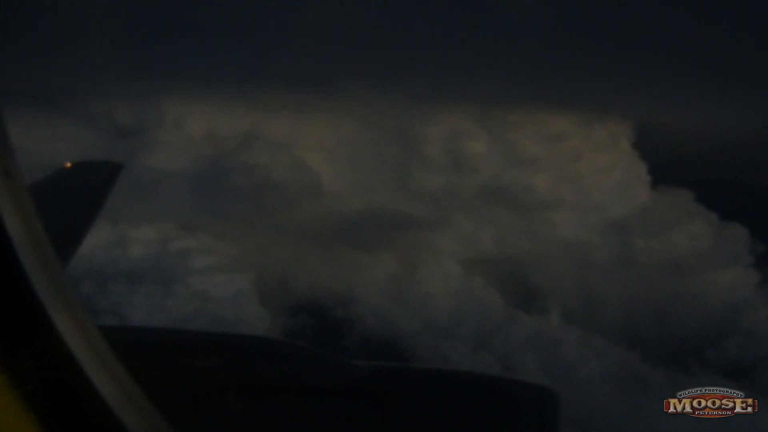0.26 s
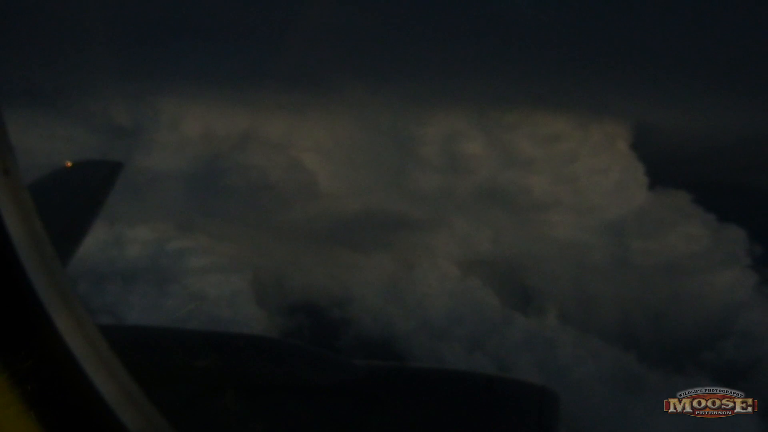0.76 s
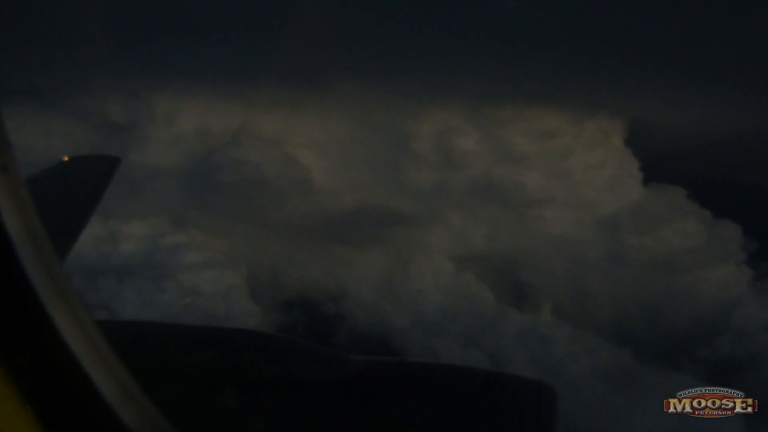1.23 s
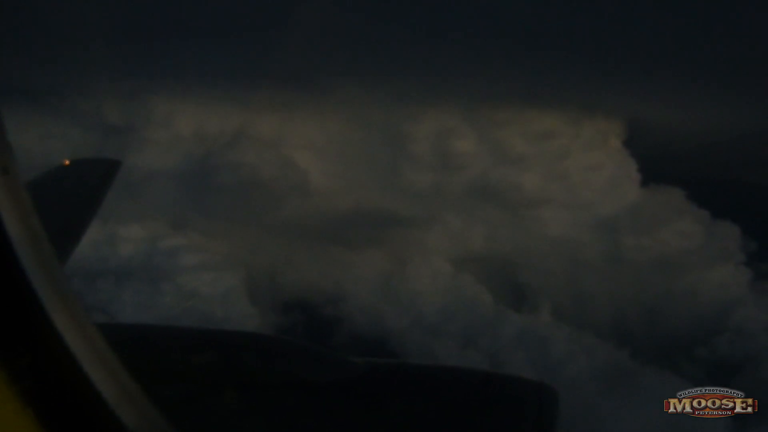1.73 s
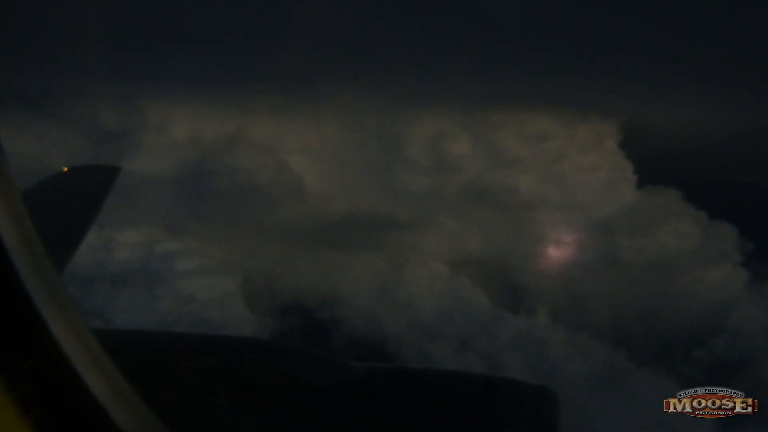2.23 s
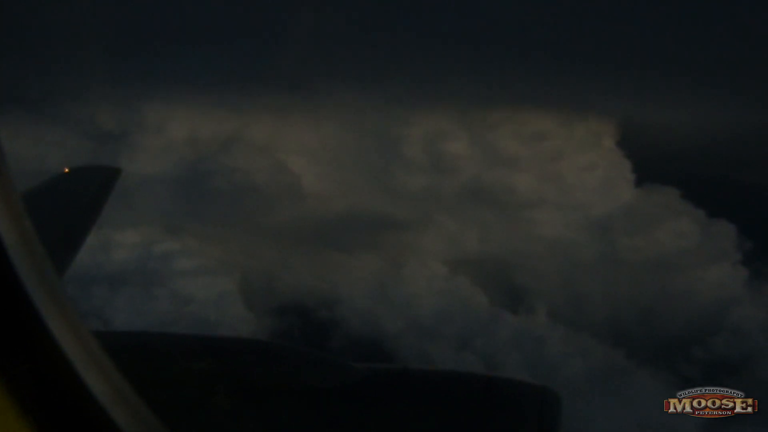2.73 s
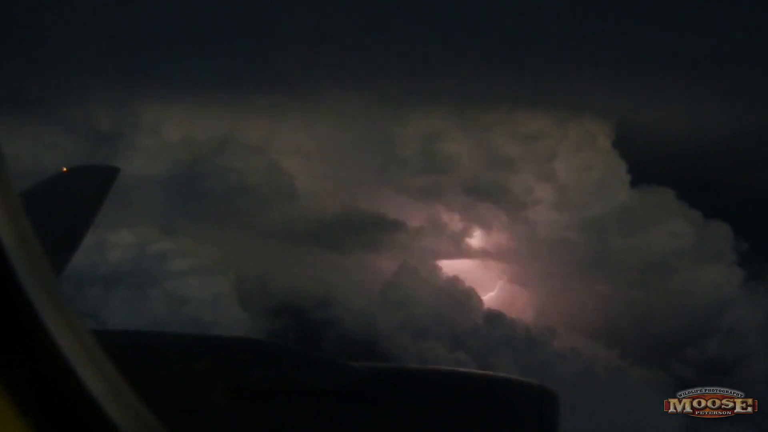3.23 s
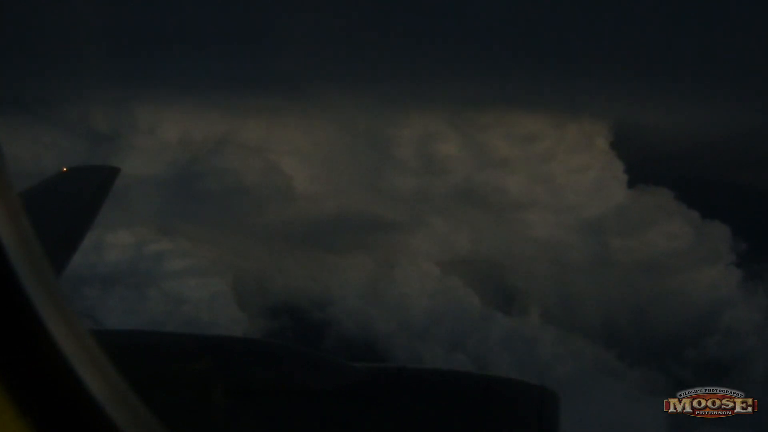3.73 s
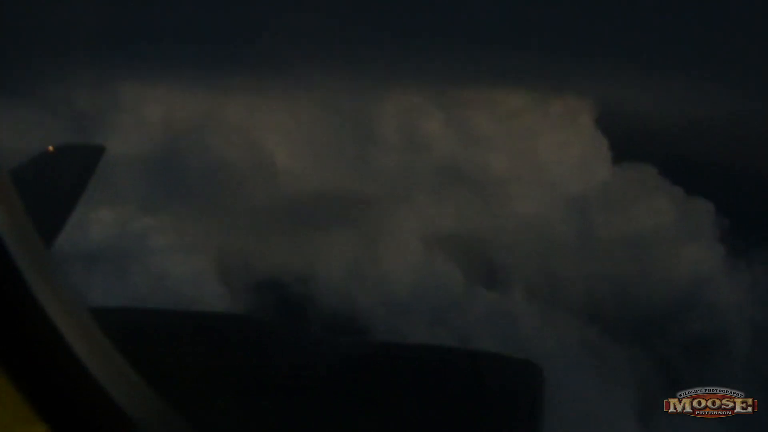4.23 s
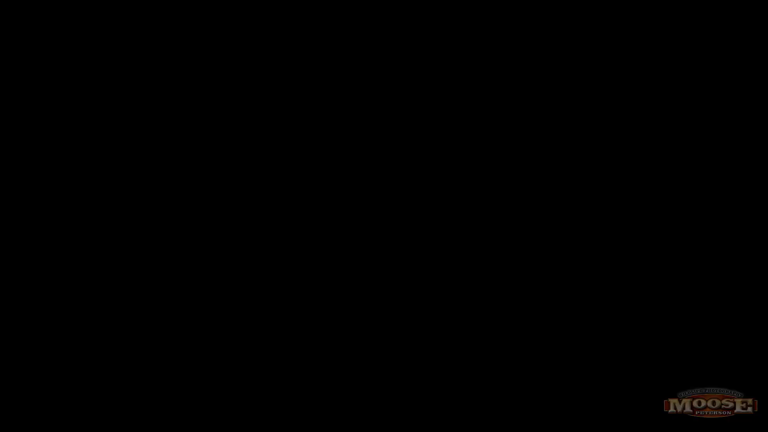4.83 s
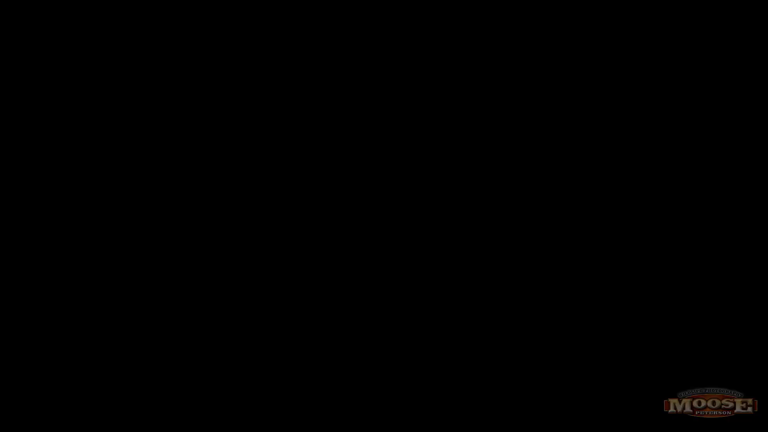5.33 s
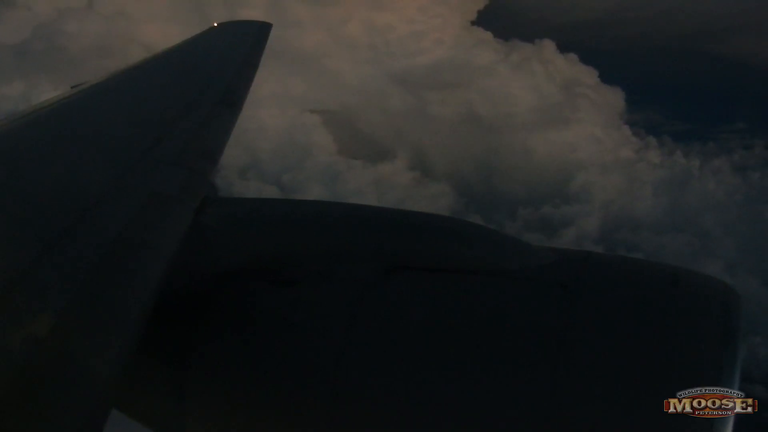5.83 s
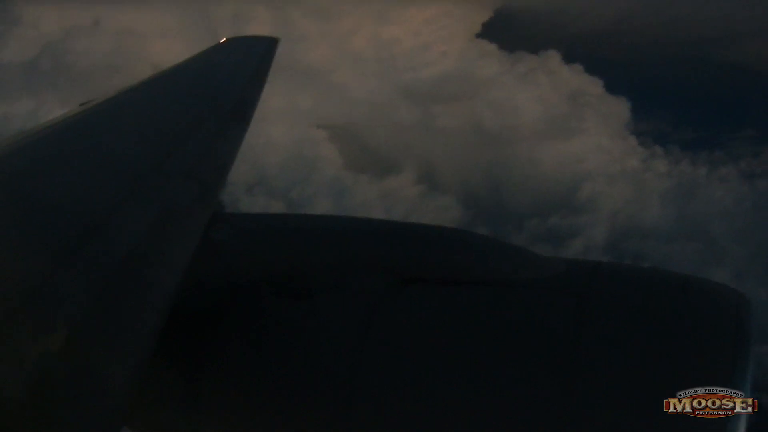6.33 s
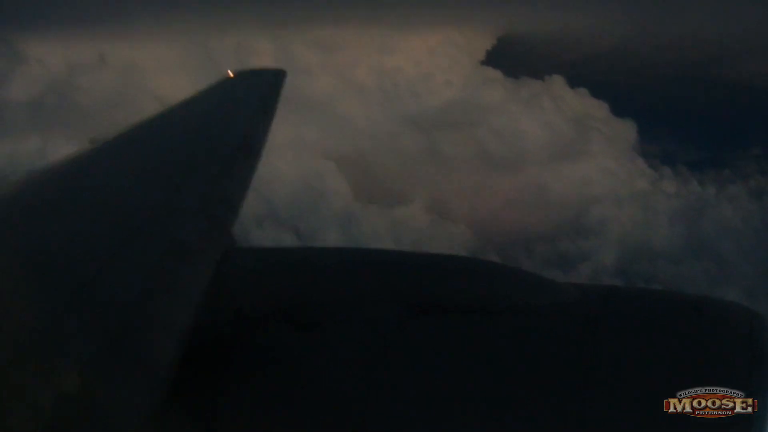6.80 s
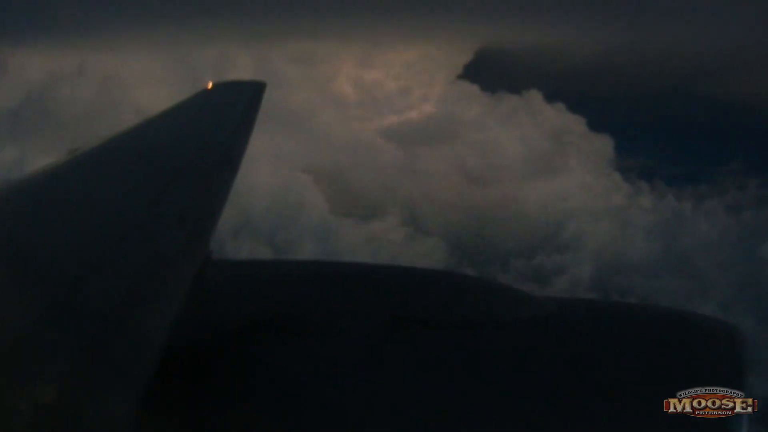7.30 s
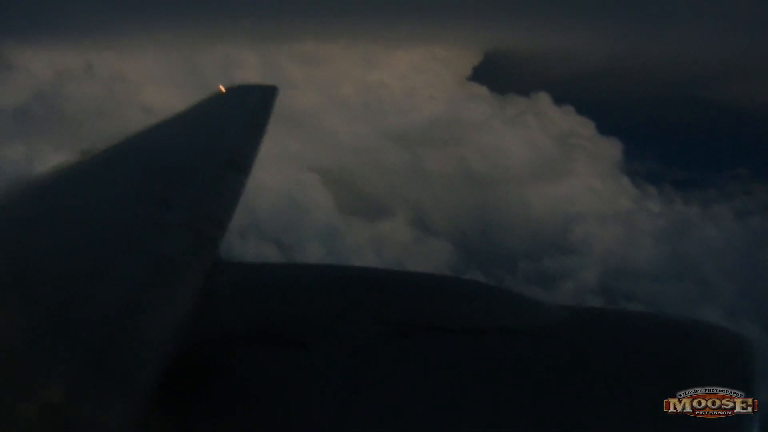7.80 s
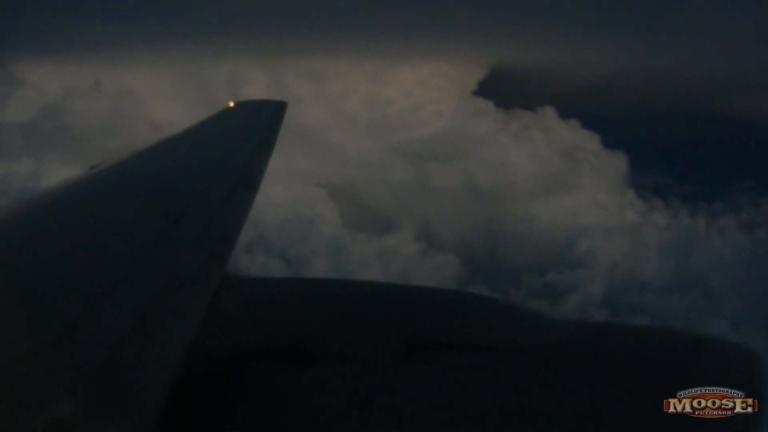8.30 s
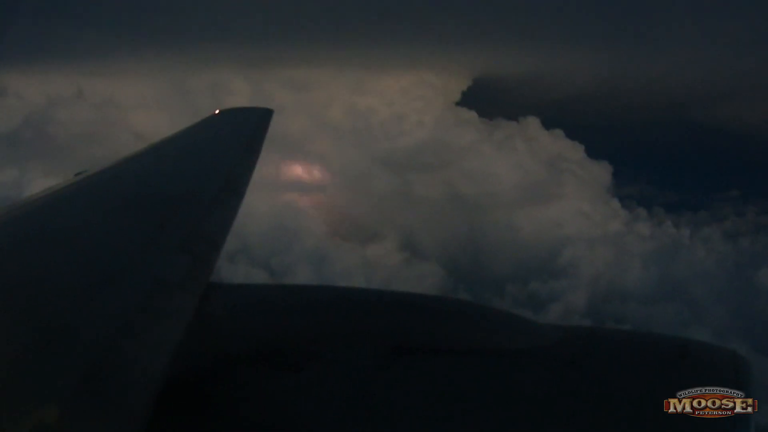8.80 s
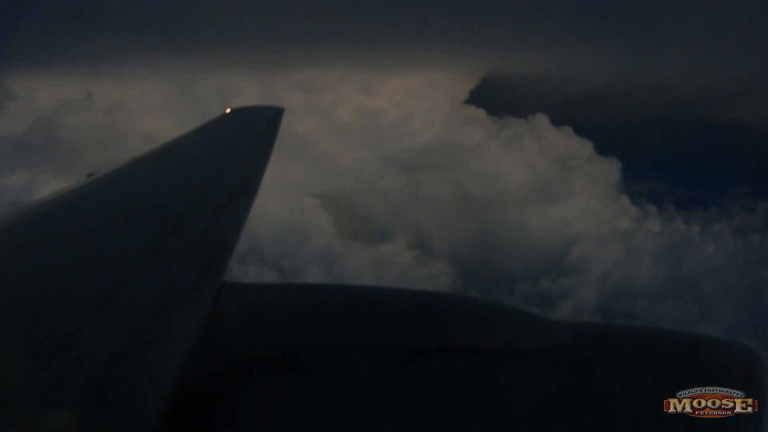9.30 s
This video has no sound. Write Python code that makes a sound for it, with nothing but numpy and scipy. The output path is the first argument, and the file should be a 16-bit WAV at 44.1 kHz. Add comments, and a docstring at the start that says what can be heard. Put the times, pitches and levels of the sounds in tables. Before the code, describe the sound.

Inside a cruising airliner, deep engine drone and rushing air sag and swell restlessly, stop dead for about a second, then resume with a click.

```python
"""A broad roar with a deep throbbing hum, at a window seat in a jet airliner in cruise, on a stereo pair.
Two stretches, a second of silence between; two bands are uneven in level, the whole keeps sagging and swelling.
Air along the fuselage is noise shaped by cabin resonances; hum, fan drone and faint blade whine are
wavering sines. Each sag has a tick just ahead of it, and the sound comes back on with a click."""
import sys
import numpy as np
from scipy import signal
from scipy.fft import rfft, irfft, next_fast_len
from scipy.io import wavfile
from scipy.ndimage import uniform_filter1d, minimum_filter1d

SR = 44100
rng = np.random.default_rng(int(sys.argv[2]) if len(sys.argv) > 2 else 0)


def persist_wave(psi):
    """Save psi, clipped to +-1, as 16-bit WAV."""
    counts = np.round(np.clip(psi, -1, 1) * 32767).astype(np.int16)
    wavfile.write(sys.argv[1], SR, np.atleast_2d(counts).T)


N = 421155

# the two stretches in the seat: [start t/s, end t/s]
STRETCH_TIMES = [(0.0, 4.451), (5.522, 9.56)]
# airflow along the fuselage, before resonances and level changes:
# [f/Hz, first stretch density/dB per Hz, second stretch density/dB per Hz]
AIRFLOW_SPECTRUM = [(25.1, -70.5, -67), (45, -67, -64), (66, -52.5, -47), (114.7, -43.5, -46.5),
                    (278, -53.5, -48.5), (552, -53.5, -51), (1171, -64.5, -65), (2244, -73, -74),
                    (3424, -82, -86), (6190, -83.5, -87), (8300, -91.5, -91), (12500, -88.5, -94.5),
                    (15700, -96.5, -100.3)]
# resonances of cabin and panels: [f/Hz, width/Hz, first stretch lift/dB, second stretch lift/dB]
CABIN_RESONANCES = [(139, 26, -0.5, 6), (156, 11.2, 5.5, 2.5), (163.8, 70, 8.5, 4), (218.3, 16, 4.5, -2.5),
                    (348.7, 57.6, 8, 9), (412.4, 122, 11.5, 9), (595, 56, 4, 1), (637, 42, 0, -1),
                    (763, 27, -0.5, -3.5), (785, 105, 7, 5.8), (1025, 33, 4, 6), (1477, 330, 0.8, 2.5),
                    (2190, 140, -0.5, 1), (2650, 340, -1.5, 3.5), (7600, 240, 4, 6)]
# stereo width of the airflow: [f/Hz, side minus mid level/dB]
STEREO_WIDTH = [(60, -17), (110, -22), (200, -23), (380, -21), (700, -17), (1290, -11.5), (2380, -7),
                (4400, -3.3), (8120, 0.8), (15000, 2.5)]
# stereo balance of the airflow, one table per stretch: [f/Hz, left minus right level/dB]
FIRST_BALANCE = [(60, -1.0), (110, -1.0), (200, -0.5), (380, -1.0), (700, 0.0), (1290, -0.5), (2380, -1.0),
                 (4400, 1.5), (8120, 2.0), (15000, 1.0)]
SECOND_BALANCE = [(60, -0.5), (110, -1.0), (200, -1.0), (380, -1.0), (700, -2.0), (1290, -3.0),
                  (2380, -2.0), (4400, 0.5), (8120, 2.0), (15000, 0.0)]
# lag of the airflow on the right, a path of under a centimetre: [lag/s], one per stretch
RIGHT_LAGS = [1.2e-5, 2.8e-5]
# fan shaft speed: [f/Hz], one per stretch
SHAFT_SPEEDS = [60.52, 60.47]
# multiples of the shaft speed that sound, the last being the blade rate: [order]
FAN_ORDERS = [3, 4, 6, 7, 36]
# rms of those orders before the level changes, one row per stretch: [level/dB, one column per order]
FAN_LEVELS = [
    [-37.5, -37.5, -27.5, -29, -55.5],
    [-36, -37.5, -22, -31, -58.5],
]
# deep tones carried by the airframe: [f/Hz]
HUM_TONES = [33.28, 60.48, 80.13]
# their strengths within the hum: [level/dB relative to the hum curve]
HUM_BALANCE = [-21.5, -5.5, -4.5]
# uneven level of the low cabin boom, on top of its steadied band: [t/s, level/dB]
BOOM_BAND_LEVEL = [(0.04, -1.2), (0.8, 1.3), (0.94, 0.3), (1.06, 5.5), (1.2, -5), (1.3, 1.6), (1.66, -3.5),
                   (1.88, 2), (2.18, 0.9), (2.42, 2), (2.48, -4.5), (2.58, 4.5), (2.8, -7), (2.98, 2.5),
                   (3.24, -2.3), (3.6, 0.3), (3.82, -7.5), (3.92, 4), (4.4, -1.6), (5.58, -6), (5.8, 4.5),
                   (5.94, -3.5), (6.06, 1.4), (6.3, -4), (6.38, 0.8), (6.64, 0.5), (6.84, -0.0),
                   (6.96, -6.5), (7.18, 1.5), (7.38, -1), (7.44, 3), (7.56, -5), (7.74, -0.5), (7.84, -2),
                   (8.94, 3), (9.02, -4.5), (9.16, 2), (9.5, -2.5)]
# uneven level of the band from 350 to 455 Hz, on top of its steadied sound: [t/s, level/dB]
DRONE_BAND_LEVEL = [(0.04, 1.7), (0.34, -1.5), (0.42, 1.7), (0.56, 1), (1.2, -0.2), (1.3, 3.5), (1.7, -2.7),
                    (1.88, 3.5), (1.96, -4), (2.04, 4.5), (2.12, -1), (2.46, -4), (2.54, 5.5), (2.66, -5.5),
                    (3.12, 1), (3.28, -3.5), (3.44, 2), (3.58, -3), (4.4, 0.8), (5.58, -3.5), (5.66, 1),
                    (5.82, 1.1), (6.3, -1.3), (6.44, 0.5), (6.7, -1.5), (6.82, 1.2), (7.14, -4), (7.26, -1),
                    (7.68, 0), (7.82, 0), (8.0, 0.5), (8.12, -7.5), (8.2, 1), (8.32, 1), (8.44, 1.5),
                    (9.22, -1.5), (9.3, 2.5), (9.5, 0.8)]
# slow changes, one table per stretch: [t/s, whole sound level/dB, hum level/dB, mid roar lift/dB]
FIRST_CHANGES = [(0.2, -0.1, -18, -1.5), (0.65, 1.15, -20.5, -2.5), (1.15, 2, -28.5, -2.5),
                 (1.65, 4.5, -21, -1.3), (2.6, 0.1, -16.5, -1.5), (3.1, 2, -17, -3), (3.95, 2.5, -23, -2),
                 (4.45, 0, -27.5, 0)]
SECOND_CHANGES = [(5.6, -0.2, -24, -0.9), (5.9, 3.5, -24, 0.11), (6.3, 1.8, -19, 0.24),
                  (7.2, 2.5, -20, 0.53), (7.55, -0.5, -21.5, 0.82), (7.9, 1.4, -26, 1.4),
                  (8.65, 4.5, -31, 0.11), (9.45, 2.2, -21, -0.6)]
# sudden sags of the whole sound, each with a tick: [tick t/s, drop/dB, tick impulse before filtering/dB]
SAG_EVENTS = [(0.169, 0.1, -8), (0.323, 2, -8), (0.5596, 3.5, -7), (0.8647, 2, -9), (1.0393, 2.5, -8),
              (1.292, 4, -19), (1.581, 3, -16), (1.7388, 3, -15), (1.872, 3.5, -19), (2.0715, 3, -14),
              (2.2506, 3, -11), (2.457, 3.5, -17), (2.6652, 2.5, -13), (2.8406, 4, -12), (3.1024, 4, -11),
              (3.2847, 3, -8.5), (3.547, 2.5, -9), (3.635, 3, -16), (3.905, 2.5, -14), (4.089, 2, -8),
              (4.177, 3, -16), (5.704, 4.5, -11), (5.85, 5, -20), (6.189, 2.5, -17), (6.332, 3.5, -10),
              (6.5214, 3.5, -11), (6.636, 4.5, -12), (6.9365, 4, -18), (7.261, 1, -10), (7.284, 3.5, -17),
              (7.3575, 4, -12), (7.638, 3.5, -10), (7.9912, 4.5, -15), (8.3805, 3.5, -17), (8.5725, 3, -14),
              (8.6465, 3.5, -22), (8.9116, 2, -16), (9.037, 2.5, -22), (9.182, 4, -16), (9.4655, 3.6, -14)]

BOOM_BAND_HZ, DRONE_BAND_HZ = (130, 180), (350, 455)
FADE_IN_S, FADE_IN_DB = 0.022, -16   # the restart fades up faintly over some 20 ms
FADE_OUT_DB, FADE_OUT_DB_PER_S = -21.5, 1100   # a quick, faint fade-out after each stop
SWELL_DB_PER_S = 11.5   # the climb back after every sag
TICK_LEAD_S = 0.0045   # the tick comes just before the level falls
SNAP_DB = 0   # restart click, as an impulse before filtering
RESTART_LIFT_DB, RESTART_LIFT_S = 6.5, 0.026   # the level is raised for 26 ms on either side of the restart
CUTOFF_HZ = 15750

RESTART_S = STRETCH_TIMES[1][0]
FFT_SIZE = next_fast_len(N)
TIME = np.arange(N) / SR
FREQS = np.maximum(np.fft.rfftfreq(FFT_SIZE, 1 / SR), 1)
LEFT_RIGHT = np.array([[1], [-1]])


def from_db(db):
    """Decibels to gain."""
    return 10 ** (np.asarray(db) / 20)


def in_time(rows):
    """The columns of a curve table at every sample."""
    times, *columns = np.transpose(rows)
    return [np.interp(TIME, times, column) for column in columns]


def over_hz(points, column=1):
    """One column of a spectrum table at every frequency, interpolated along log frequency."""
    points = np.array(points)
    return np.interp(np.log(FREQS), np.log(points[:, 0]), points[:, column])


def below(top_hz, order=8):
    """The share of every frequency that a steep low-pass lets through."""
    return 1 / (1 + (FREQS / top_hz) ** order)


def to_sound(spectrum):
    """Spectrum back to N samples of sound."""
    return irfft(spectrum, FFT_SIZE)[:, :N]


def drift(rate):
    """Smooth random wander of spread 1, changing about rate times a second."""
    pole = np.exp(-200 * np.pi * rate / SR)   # one step every 100 samples
    steps = rng.standard_normal(N // 100 + 2002)
    slow = signal.lfilter([1], [1, -2 * pole, pole * pole], steps)[2000:]   # settled part only
    return np.interp(np.arange(N) / 100, np.arange(len(slow)), slow / slow.std())


def treble_ripple(ripple_db=1.95, above_hz=1500, below_hz=7500, count=12):
    """A random fine ripple in level across the treble frequencies, fading towards the very top."""
    periods = rng.uniform(0.0007, 0.006, count)   # ripples per Hz
    ripple = sum(np.cos(2 * np.pi * FREQS * period) for period in periods) * np.sqrt(2 / count)
    treble = 1 / (1 + (above_hz / FREQS) ** 2) / (1 + (FREQS / below_hz) ** 2)
    return from_db(ripple_db * ripple * treble)


def diffuse_noise(stretch):
    """Left and right noise spectra around 0 dB per Hz: alike in the bass, unrelated in the treble."""
    mid, side = rfft(rng.standard_normal((2, FFT_SIZE))) * np.sqrt(SR / 2)
    width = from_db(over_hz(STEREO_WIDTH))
    pair = (mid + LEFT_RIGHT * width * side) / np.sqrt(1 + width ** 2)
    balance_db = over_hz([FIRST_BALANCE, SECOND_BALANCE][stretch])
    pan = from_db(LEFT_RIGHT * balance_db / 2)
    lag = np.exp(1j * np.pi * LEFT_RIGHT * FREQS * RIGHT_LAGS[stretch])   # left leads right
    return pair * pan * lag * treble_ripple()


def airflow(stretch, roar_db, splits_hz=(270, 600, 1150, 2500),
            gust_db=(0.6, 1.0, 1.25, 0.7, 0.45), gusts_per_s=(4.1, 5, 6, 7, 8.8)):
    """Turbulence on the skin, coloured by the cabin: five bands from rumble to hiss, each gusting on its own."""
    colour_db = over_hz(AIRFLOW_SPECTRUM, column=1 + stretch)
    for hz, width, *lift_db in CABIN_RESONANCES:
        colour_db = colour_db + lift_db[stretch] / (1 + (2 * (FREQS - hz) / width) ** 2)
    no_subsonics = FREQS ** 2 / (FREQS ** 2 + 10 ** 2)
    air = diffuse_noise(stretch) * from_db(colour_db) * no_subsonics
    edges = [0] + [below(hz) for hz in splits_hz] + [1]
    bands = []
    for lower, upper, db, rate in zip(edges, edges[1:], gust_db, gusts_per_s):
        bands.append(to_sound(air * (upper - lower)) * from_db(db * drift(rate)))
    rumble, roar, rush, wash, hiss = bands
    return rumble + roar * from_db(roar_db) + rush + wash + hiss


def tone(hz, waver_db, wander_rad, skew_rad):
    """A machine tone of rms about 1, level and phase wandering; it meets left and right out of step."""
    phase = 2 * np.pi * (hz * TIME + rng.random()) + wander_rad * drift(0.7)
    wave = np.sqrt(2) * np.sin(phase + LEFT_RIGHT * skew_rad / 2)
    return wave * from_db(waver_db * drift(12.0))


def fan(stretch, pan_db=-0.5):
    """The engine fan sings on multiples of its shaft speed."""
    tones = 0
    for order, db in zip(FAN_ORDERS, FAN_LEVELS[stretch]):
        hz = order * SHAFT_SPEEDS[stretch]
        wander_rad = 0.19 * np.sqrt(order)
        tones = tones + from_db(db) * tone(hz, waver_db=1.5, wander_rad=wander_rad, skew_rad=0.083)
    return tones * from_db(LEFT_RIGHT * pan_db / 2)


def hum(hum_db, pan_db=-0.7):
    """Close deep tones beat against each other into a fast throb."""
    tones = 0
    for hz, db in zip(HUM_TONES, HUM_BALANCE):
        tones = tones + from_db(db) * tone(hz, waver_db=0.0, wander_rad=0.14, skew_rad=0.22)
    return tones * from_db(hum_db + LEFT_RIGHT * pan_db / 2)


def uneven_band(sound, band_hz, curve, steadiness, smooth_s=0.15):
    """One band of the sound is steadied, then rises and falls along its level curve."""
    low, high = band_hz
    share = below(high, order=16) - below(low, order=16)
    band = to_sound(rfft(sound, FFT_SIZE) * share)
    span = int(smooth_s * SR)
    power = uniform_filter1d(uniform_filter1d(np.mean(band ** 2, axis=0), span), span)
    steadying = (power / power.mean()) ** (-np.clip(steadiness, 0, 1) / 2)
    level_db, = in_time(curve)
    return sound - band + band * from_db(level_db) * steadying


def switched_on(start, end):
    """1 between start and end, with a faint fade ahead of the start and after the end."""
    fade_in = from_db(FADE_IN_DB) * np.clip(1 + (TIME - start) / FADE_IN_S, 0, 1)
    fade_out = from_db(FADE_OUT_DB - FADE_OUT_DB_PER_S * np.clip(TIME - end, 0, 0.5))
    gate = np.select([TIME < start, TIME < end], [fade_in, 1.0], fade_out)
    return uniform_filter1d(gate, size=24)


def sag_and_swell(fall_s=0.0063, surge_db=0.7, surge_s=0.022):
    """At each sag the level surges briefly, drops within milliseconds and climbs back at a steady rate."""
    level_db = RESTART_LIFT_DB * (np.abs(TIME - RESTART_S) < RESTART_LIFT_S)
    for tick_s, drop_db, _ in SAG_EVENTS:
        fall = round((tick_s + TICK_LEAD_S) * SR)
        level_db[fall - round(surge_s * SR):fall] += surge_db
        level_db[fall:] += np.minimum(SWELL_DB_PER_S * TIME[:N - fall] - drop_db, 0)
    return from_db(uniform_filter1d(level_db, max(int(fall_s * SR), 1)))


def pop(events, dull_hz, top_hz, thin_hz=220):
    """Each (t/s, level/dB) is a short pressure pulse of either sign, decaying fast, then band-passed."""
    clicks = np.zeros(N)
    for at_s, db in events:
        clicks[round(at_s * SR)] = from_db(db) * rng.choice([-1, 1])
    decay = np.exp(-2 * np.pi * dull_hz / SR)
    pulses = signal.lfilter([1], [1, -decay], clicks + 1e-18)
    band_pass = signal.butter(2, [thin_hz, top_hz], "band", fs=SR, output="sos")
    return signal.sosfilt(band_pass, pulses)


def ticks():
    """A dull tick at every sag, half buried in the roar, and the brighter click of the restart."""
    sag_ticks = pop([(tick_s, tick_db) for tick_s, _, tick_db in SAG_EVENTS], dull_hz=800, top_hz=2300)
    restart_click = pop([(RESTART_S, SNAP_DB)], dull_hz=1200, top_hz=4000)
    return sag_ticks + restart_click


def scene():
    """Airflow, fan and hum, two bands uneven in level, switched on and off with each stretch."""
    seat = 0
    for stretch, changes in enumerate((FIRST_CHANGES, SECOND_CHANGES)):
        level_db, hum_db, roar_db = in_time(changes)
        cabin = airflow(stretch, roar_db) + fan(stretch)
        cabin = uneven_band(cabin, BOOM_BAND_HZ, BOOM_BAND_LEVEL, steadiness=0.94)
        cabin = uneven_band(cabin, DRONE_BAND_HZ, DRONE_BAND_LEVEL, steadiness=0.8)
        cabin = cabin + hum(hum_db)
        seat = seat + switched_on(*STRETCH_TIMES[stretch]) * from_db(level_db) * cabin
    return seat * sag_and_swell() + ticks()


def record(dry, ceiling=1.0, hold_s=0.0054):
    """A quick limiter holds the peaks at full scale, then a steep low-pass cuts the top."""
    span = int(hold_s * SR)
    headroom = np.minimum(1, ceiling / (np.abs(dry).max(axis=0) + 1e-9))
    gain = uniform_filter1d(minimum_filter1d(headroom, span), span)
    low_pass = signal.ellip(12, 0.1, 90, CUTOFF_HZ, fs=SR, output="sos")
    return signal.sosfilt(low_pass, dry * gain)


dry = scene()
out = record(dry)
persist_wave(out)
```